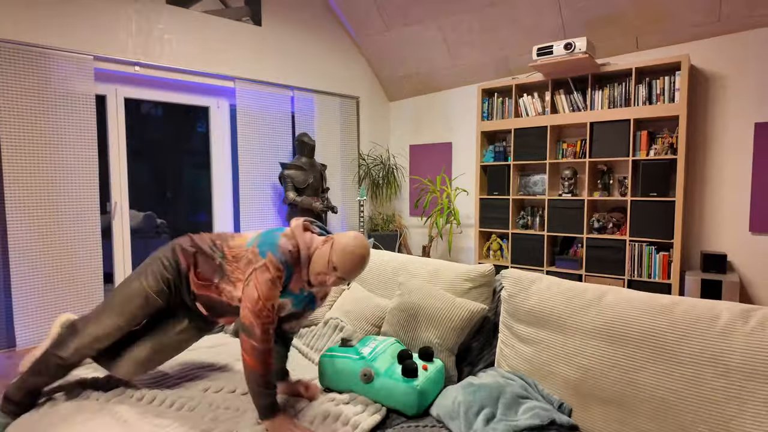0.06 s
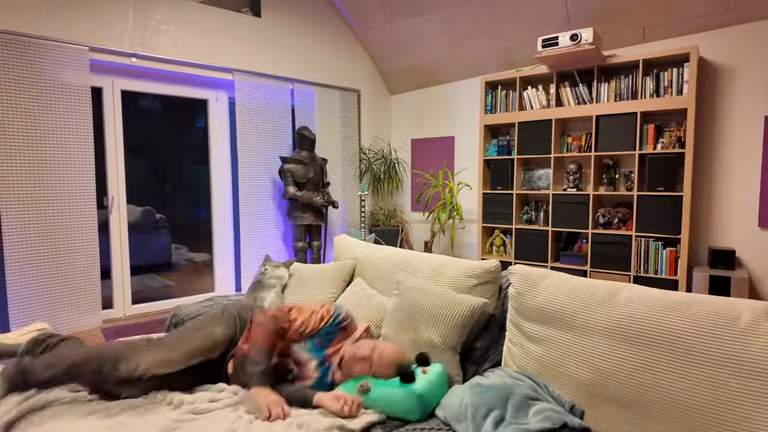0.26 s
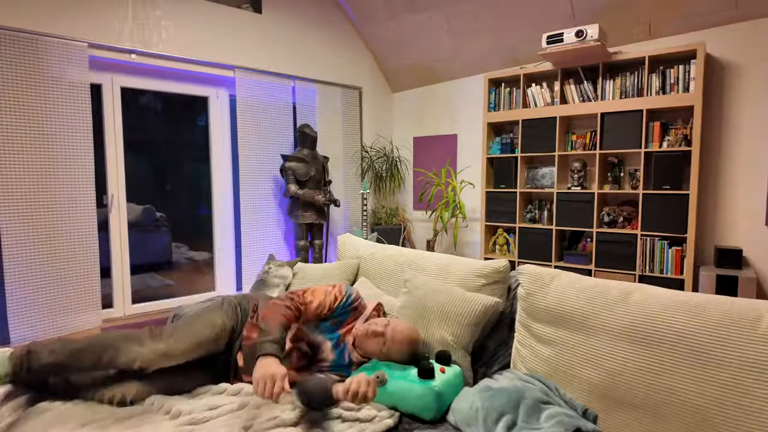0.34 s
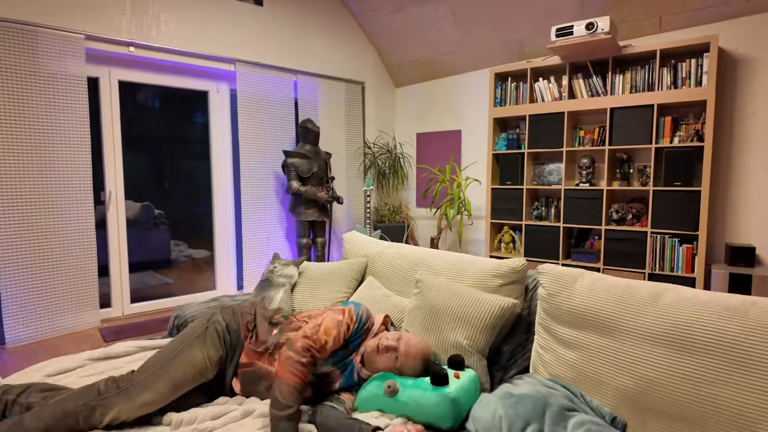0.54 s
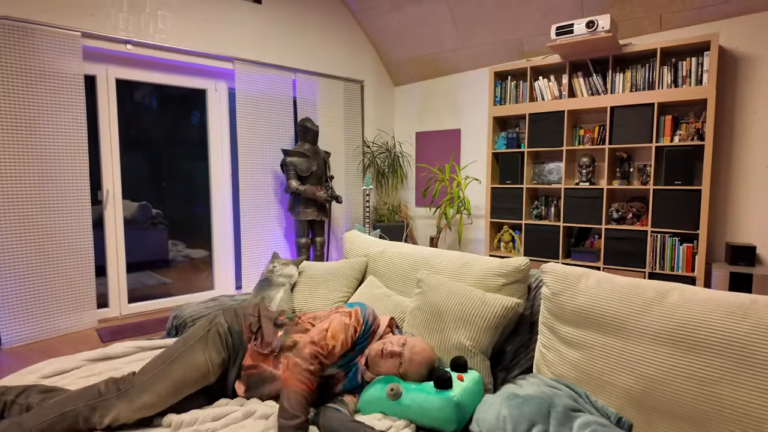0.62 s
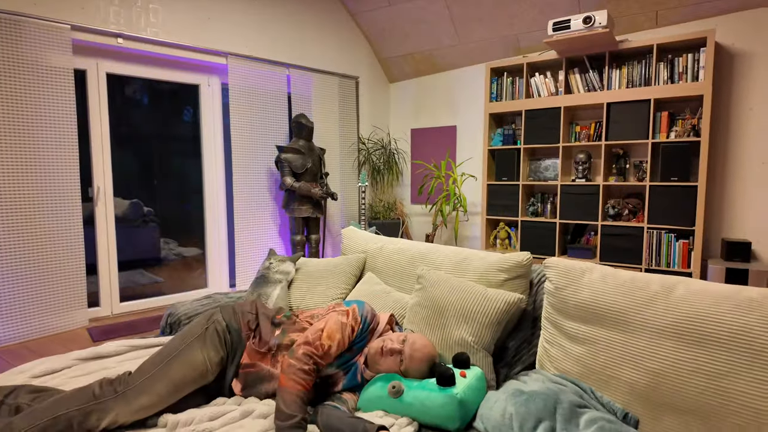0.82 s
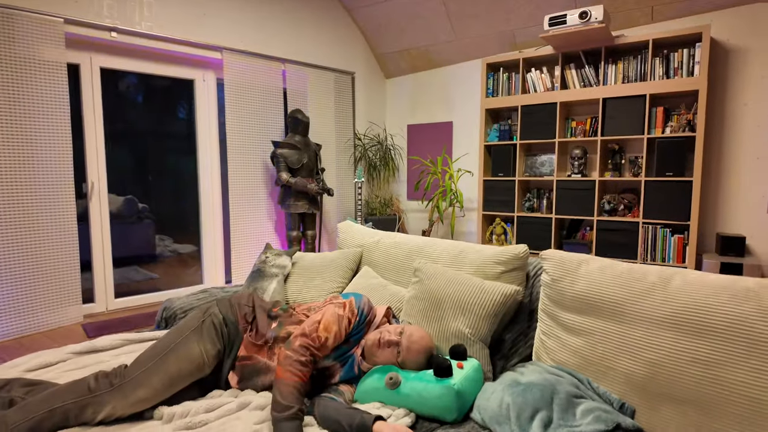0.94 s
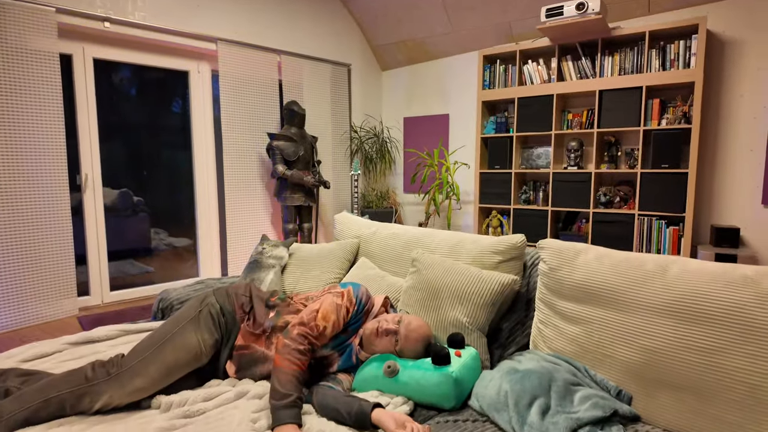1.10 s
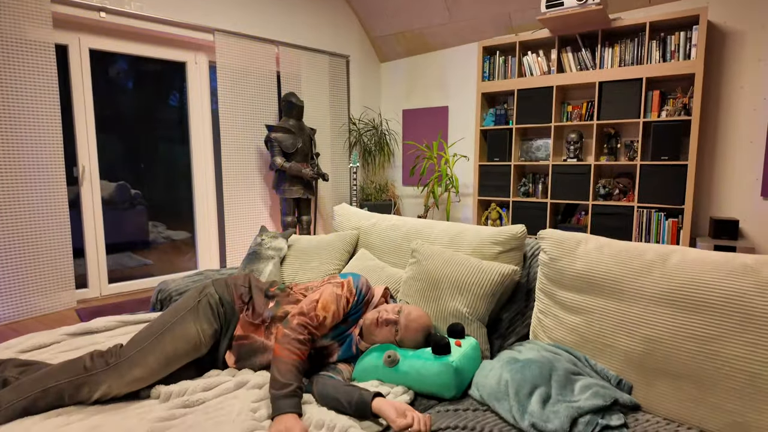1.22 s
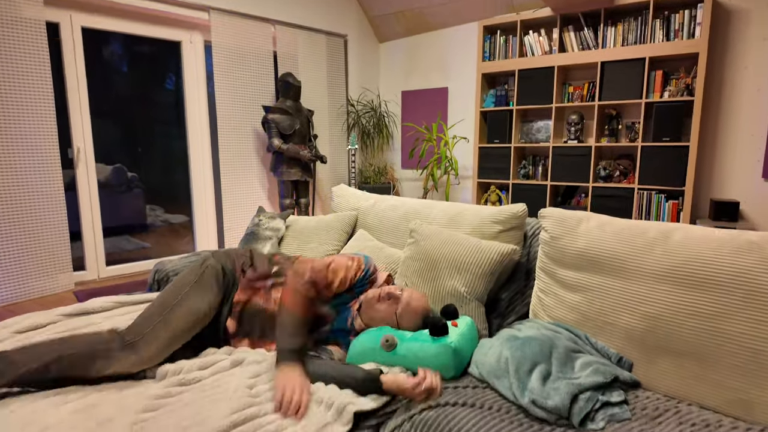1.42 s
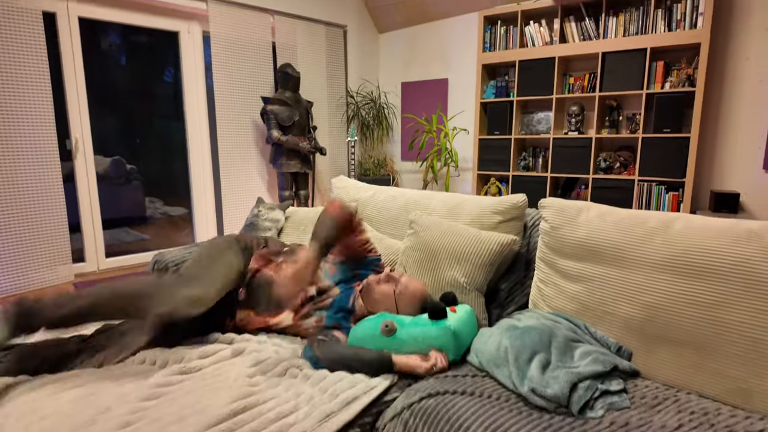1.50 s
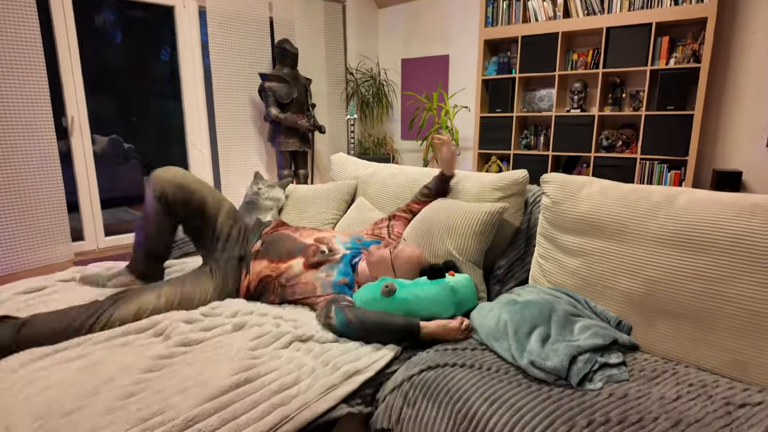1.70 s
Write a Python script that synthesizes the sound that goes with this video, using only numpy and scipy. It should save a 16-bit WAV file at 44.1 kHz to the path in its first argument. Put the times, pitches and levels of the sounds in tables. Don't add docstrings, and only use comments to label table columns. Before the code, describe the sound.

Heavy flop onto sofa cushions, a quick rebound, near silence, then a softer rustling roll-over

```python
import sys
import numpy as np
from scipy import signal
from scipy.fft import rfft, irfft
from scipy.io import wavfile
from scipy.ndimage import uniform_filter1d

SR = 44100
rng = np.random.default_rng(int(sys.argv[2]) if len(sys.argv) > 2 else 0)


def decibels_to_gain(level_db):
    exponent = np.asarray(level_db, float) / 20
    return 10 ** exponent


def wav_out(sig):
    wavfile.write(sys.argv[1], SR, np.round(np.clip(np.atleast_2d(sig).T, -1, 1) * 32767).astype(np.int16))


N = 77175

# frequency in Hz, likeness (0-1).
LIKENESS = [(100, 1), (300, 0.48), (700, 0.38), (3000, 0.04)]


def evened(x):
    return x / np.sqrt(np.mean(x ** 2) + 1e-20)


def read(points, hz):
    f, value = np.transpose(points)
    return np.interp(np.log(hz + 1), np.log(f + 1), value)


def swell(peak, db, rise, t60):
    t = np.arange(N) / SR - peak
    fall = decibels_to_gain(db - 60 * np.maximum(t, 0) / t60)
    return fall * np.clip(1 + t / rise, 0, 1) ** 2


def resonate(x, hz, width):
    turn = np.exp(2j * np.pi * hz * np.arange(x.shape[-1]) / SR)
    r = np.exp(-np.pi * width / SR)
    smooth = signal.lfilter([(1 - r) ** 2], [1, -2 * r, r * r], x / turn)
    return 2 * (turn * smooth).real


def decorrelate(left, other, hz):
    same = np.clip(read(LIKENESS, hz), 0, 1)[:, None]
    return same * left + np.sqrt(1 - same ** 2) * other


def noise(colour, patchy_db):
    frames, hz = N // 128 + 5, np.fft.rfftfreq(512, 1 / SR)
    a, b, c, d, patches = rng.standard_normal((frames, 257, 5)).T
    patches = uniform_filter1d(patches, size=6, axis=0)
    patches = evened(uniform_filter1d(patches, size=10, axis=1))
    left = a + 1j * b
    z = np.array([left, decorrelate(left, c + 1j * d, hz)]) * decibels_to_gain(patchy_db * patches)
    x = signal.istft(z, nperseg=512, noverlap=384)[1][:, :N]
    gain = decibels_to_gain(read(colour, np.fft.rfftfreq(N, 1 / SR)))
    return evened(irfft(rfft(x) * gain, N))


def floor():
    # frequency in Hz, level in dB, share of the load drift.
    overtones = [(100, -73, .3), (300, -72, -.4), (399.5, -70, 1), (499, -77, 1.2)]
    # time in seconds, level in dB.
    load = [
        (0, 0),
        (.9, 0),
        (1.12, 1),
        (1.24, -5),
        (1.75, -5),
    ]
    # time in seconds, level in dB.
    rumble_level = [
        (0, -46),
        (.17, -53.5),
        (.55, -59),
        (.62, -65),
        (.85, -70.5),
        (1.15, -64),
        (1.42, -68),
        (1.6, -59),
        (1.75, -50.5),
    ]
    # frequency in Hz, level in dB per Hz.
    rumble_colour = [(20, -22), (50, -3), (128, -1.5), (300, -8), (600, -15), (3000, -35.5)]
    hiss_colour = [(25, -34), (400, -16.5), (800, -22.5), (3000, -25.5), (8000, -34), (11500, -38),
                   (13500, -33.5), (15700, -31.5)]

    t = np.arange(N) / SR
    drift_db = np.interp(t, *np.transpose(load))
    hum = np.zeros(N)
    for hz, db, share in overtones:
        waver = evened(signal.resample(rng.standard_normal(14), N))
        level = decibels_to_gain(db + 0.8 * waver + share * drift_db)
        hum += np.sqrt(2) * level * np.sin(2 * np.pi * hz * t)
    rumble = decibels_to_gain(np.interp(t, *np.transpose(rumble_level))) * noise(rumble_colour, patchy_db=1)
    return hum + rumble + decibels_to_gain(-67) * noise(hiss_colour, patchy_db=1.0)


def room(x):
    # frequency in Hz, t60 in seconds.
    decay = [(60, .22), (250, .2), (1000, .2), (8000, .12)]
    taps = np.zeros((2, SR // 2))
    at = np.arange(200, SR // 2 - 20, 20) + rng.integers(0, 20, (2, (SR // 2 - 201) // 20))
    np.put_along_axis(taps, at, rng.choice([-1., 1.], at.shape), 1)
    hz, t, z = signal.stft(taps, SR, nperseg=512)
    z = np.array([z[0], decorrelate(z[0], z[1], hz)])
    fall = decibels_to_gain(-60 * t / read(decay, hz)[:, None])
    tail = signal.istft(z * fall, SR, nperseg=512)[1]
    return signal.fftconvolve(x, tail / np.linalg.norm(tail[0]), axes=1)[:, :N]


def cloth():
    # peak in seconds, level in dB, rise in seconds, t60 in seconds, brightness (0-1).
    strokes = [(.02, -50.5, 0.09, 0.13, 0.3), (.05, -55, 0.14, 1.8, 0.2), (0.236, -37, 0.041, 0.15, 0.47),
               (0.268, -35, 0.016, 0.04, 0.8), (.3, -53, 0.0095, .35, .1), (.502, -49, 0.083, 0.22, 0.27),
               (0.951, -69, 0.1, 1.11, .4), (1.13, -66, 0.15, 0.545, 0.36), (1.449, -44, 0.022, 0.35, 0.14),
               (1.488, -52, 0.016, 0.26, 0.6), (1.599, -58, 0.13, 1.3, 0.55),
               (1.679, -63, 0.055, 1.9, 0.01)]
    # peak in seconds, level in dB, rise in seconds, t60 in seconds, centre in Hz.
    whistles = [(.27, -51, .01, .1, 3700), (.27, -49, .008, .08, 7900), (.485, -61, .04, .12, 9500),
                (.475, -59, .015, .2, 1540), (.545, -59, .035, .1, 1480), (.98, -73, .07, .6, 1500),
                (1.11, -70, .05, .4, 1400), (1.45, -61, .012, .15, 10300), (1.445, -45, .012, .3, 1680),
                (1.445, -52, .008, .2, 5200), (1.49, -54, .01, .12, 2300), (1.63, -68, .05, .6, 9600)]
    # frequency in Hz, level in dB per Hz.
    dull_colour = [(300, -16.5), (600, -14.5), (1500, -14), (5600, -23.5), (7000, -31.5), (10500, -32.5),
                   (11400, -46), (13000, -40), (15700, -42)]
    bright_colour = [(1000, -37), (1800, -7), (5000, -10), (10300, -12.5), (11600, -29), (15700, -21)]
    whistle_width, pan_db = 0.09, -2.5

    dull, bright = noise(dull_colour, patchy_db=1.2), noise(bright_colour, patchy_db=1.4)
    out = np.zeros((2, N))
    for *shape, share in strokes:
        out += swell(*shape) * (max(1 - share, 0) * dull + share * bright)
    flicker = evened(uniform_filter1d(rng.standard_normal(N), size=130))
    out *= decibels_to_gain(2.1 * flicker)
    for *shape, hz in whistles:
        whistle = resonate(rng.standard_normal((2, N)), hz, whistle_width * hz)
        out += swell(*shape) * evened(whistle)
    return out * decibels_to_gain(pan_db / 2 * np.array([[1], [-1]]))


def crunches():
    # peak in seconds, level in dB, rise in seconds, t60 in seconds, centre in Hz.
    clumps = [(.006, -42.5, 0.0083, 0.13, 490), (.04, -54, 0.067, 1, 521), (0.233, -29, .012, 0.054, 953),
              (0.239, -20, 0.016, 0.13, 917), (0.234, -25, 0.032, 0.3, 447),
              (0.196, -46, 0.016, 0.12, 450.5), (0.256, -35, 0.02, 0.14, 1100),
              (.269, -20.5, 0.0056, 0.14, 783), (0.279, -25, 0.011, 0.17, 598.5),
              (0.315, -37.5, 0.023, 0.086, 1152), (0.328, -37, 0.04, 0.085, 633),
              (0.346, -26.5, 0.006, 0.056, 363), (.399, -63.5, 0.002, 0.019, 12200),
              (0.502, -55.5, 0.041, 0.29, 617), (0.511, -56.5, 0.029, 0.3, 318),
              (1.478, -32, 0.019, 0.18, 655), (1.481, -35, 0.0043, 0.11, 1020),
              (1.498, -28.5, 0.011, 0.033, 497), (1.497, -37.5, 0.031, 0.14, 940),
              (1.523, -35.5, 0.0071, 0.039, 606), (1.56, -54, 0.0058, 0.077, 530),
              (1.677, -55.5, 0.016, 0.13, 804), (1.721, -55, 0.069, 0.48, 450),
              (1.66, -61.5, .015, 0.27, 1780), (0.268, -38.5, .007, 0.054, 7406),
              (1.449, -50.5, .008, 0.33, 3800)]
    snaps_per_s, width = 4000, 0.52
    out = np.zeros((2, N))
    for *shape, hz in clumps:
        snaps = rng.standard_normal(N) * (rng.random(N) < snaps_per_s / SR)
        snaps = evened(snaps) + 0.26 * rng.standard_normal((2, N))
        out += swell(*shape) * evened(resonate(snaps, hz, width * hz))
    return out


def pings():
    # peak in seconds, level in dB, rise in seconds, t60 in seconds, pitch in Hz.
    springs = [(.006, -39, 0.015, 0.063, 526), (.026, -44.5, 0.003, .06, 643),
               (.204, -41, 0.0066, 0.043, 503), (.223, -43, 0.0082, 0.053, 348),
               (.235, -17.5, 0.0028, 0.048, 1107), (.241, -12, 0.0034, 0.069, 871.5),
               (.247, -21, 0.0052, 0.042, 534), (.269, -18.5, 0.006, 0.03, 1230),
               (.271, -12, 0.0025, .05, 716), (.284, -20, 0.0072, 0.055, 472),
               (.316, -17.5, .004, 0.037, 331.5), (.338, -22, 0.0083, 0.044, 380),
               (.492, -50.5, .006, 0.095, 609), (.503, -49.5, 0.014, 0.074, 1538),
               (.517, -47, .006, 0.063, 632), (1.449, -44.5, 0.009, 0.075, 838),
               (1.452, -37, 0.0085, 0.072, 1768), (1.455, -41, 0.01, 0.072, 2270),
               (1.472, -43, .006, .07, 2348), (1.47, -34.5, .008, 0.2, 478),
               (1.479, -29.5, 0.0061, 0.023, 1126), (1.489, -22.5, 0.003, 0.02, 484),
               (1.494, -31.5, 0.0074, .06, 810), (1.528, -41, 0.0075, 0.046, 702),
               (1.678, -52, .008, .06, 766), (1.72, -48.5, 0.018, 0.22, 493)]
    t = np.arange(N) / SR
    lead = 0.37 * np.array([[1], [-1]])
    out = np.zeros((2, N))
    for peak, db, rise, t60, hz in springs:
        out += swell(peak, db, rise, t60) * np.cos(2 * np.pi * hz * (t - peak) + lead)
    return out


def thuds():
    # start in seconds, level in dB, pitch in Hz, t60 in seconds.
    foam_pushes = [(0.06, -51, 65, .4), (0.12, -41, 65.5, 0.45), (0.179, -19.5, 72, 0.05),
                   (0.187, -10.5, 66.6, 0.12), (0.215, -13, 53.1, 0.078), (0.249, -18, 61, 0.2),
                   (0.316, -13.5, 57.3, 0.68), (0.347, -21, 62.84, 0.34), (0.406, -20, 79, 0.068),
                   (0.484, -21, 89, 0.12), (0.507, -32, 65.2, 0.2), (1.461, -25.5, 82, 0.31),
                   (1.482, -18, 67, 0.14), (1.536, -23, 76.3, 0.15), (1.701, -38, 59, .4)]
    frame_knocks = [(.002, -24.5, 177, 0.032), (0.03, -39, 181, 0.098), (0.207, -22, 206.3, 0.14),
                    (0.237, -18, 170.3, 0.066), (0.254, -9, 158.5, 0.09), (0.267, -7, 194, 0.025),
                    (.308, -2, 204.6, 0.061), (0.324, -6, 138.3, 0.15), (0.34, -13, 254, 0.12),
                    (.355, -8, 120.7, 0.081), (0.369, -8, 176.4, 0.043), (0.426, -32.5, 169, 0.23),
                    (0.489, -39, 233.4, 0.11), (0.515, -31.5, 125.2, 0.13), (0.542, -49.5, 170.7, 0.079),
                    (1.454, -29.5, 135.8, 0.055), (1.468, -19.5, 189, 0.09), (1.518, -28.5, 202, 0.1),
                    (1.549, -29.5, 144, 0.09), (1.584, -34, 153, 0.073), (1.685, -35.5, 147, 0.064),
                    (1.7, -38.5, 151, 0.33), (1.713, -29, 168.7, 0.67), (1.738, -29.5, 161, .3)]
    stirs = [
        (1.14, -59, 135, .3),
    ]
    rise_turns = 0.6
    partner, partner_db = 1.45, -13
    longest_ring_s = 0.35
    out = np.zeros(N)
    for start, db, hz, t60 in foam_pushes + frame_knocks + stirs:
        t = np.maximum(np.arange(N) / SR - start, 0)
        ring = np.sin(2 * np.pi * hz * t)
        ring += decibels_to_gain(partner_db) * np.sin(2 * np.pi * partner * hz * t)
        fall = decibels_to_gain(db - 60 * t / min(t60, longest_ring_s))
        out -= fall * np.minimum(t * hz / rise_turns, 1) * ring
    return out


def scene():
    sofa = thuds() + pings() + crunches() + cloth()
    return sofa + decibels_to_gain(-12) * room(sofa) + floor()


def roll_off(x):
    return signal.sosfilt(signal.butter(12, 15990, fs=SR, output="sos"), x)


def record(dry):
    # shut in seconds, open in seconds, low edge in Hz, high edge in Hz, gain in dB.
    shut_bands = [
        (.37, .5, 800, 1400, -8),
        (.4, .51, 620, 1350, -12),
        (.425, .49, 10, 270, -8),
        (.555, .84, 0, 270, -17),
        (.56, .68, 270, 900, -8),
        (1.575, 1.71, 10, 120, -18),
        (.555, .65, 900, 2500, -8),
        (1.28, 1.43, 420, 1300, -3),
    ]
    shut_s, mic_low_hz = 0.02, 48
    hz, t, z = signal.stft(dry, SR, nperseg=1024, noverlap=896)
    cut_db = np.zeros((len(hz), len(t)))
    for shut, reopen, low_hz, high_hz, db in shut_bands:
        band = uniform_filter1d(1. * (hz >= low_hz) * (hz < high_hz), size=3)[:, None]
        closing = (t - shut) / shut_s
        reopening = 2 * (reopen - t) / (reopen - shut)
        cut_db += db * band * np.clip(np.minimum(closing, reopening), 0, 1)
    x = signal.istft(z * decibels_to_gain(cut_db), SR, nperseg=1024, noverlap=896)[1][:, :N]
    x = signal.sosfilt(signal.butter(2, mic_low_hz, "high", fs=SR, output="sos"), x)
    return roll_off(x)


dry = scene()
out = record(dry)
wav_out(out)
```